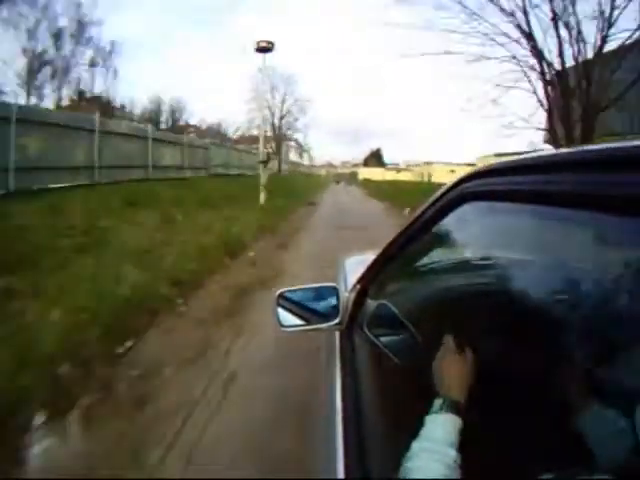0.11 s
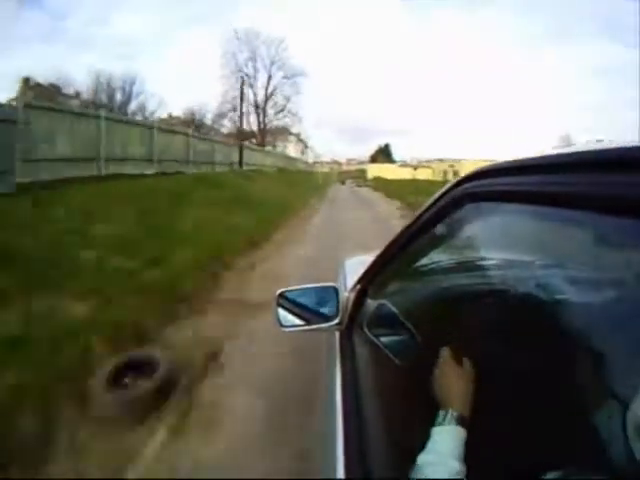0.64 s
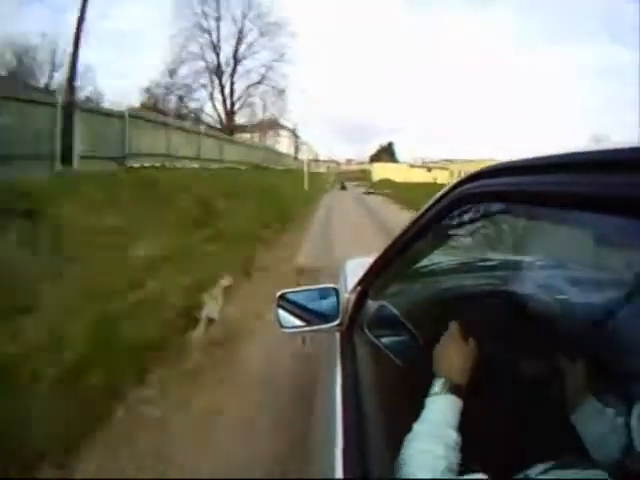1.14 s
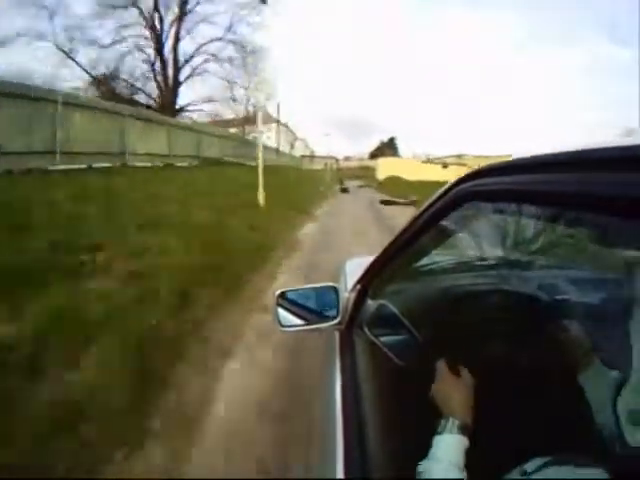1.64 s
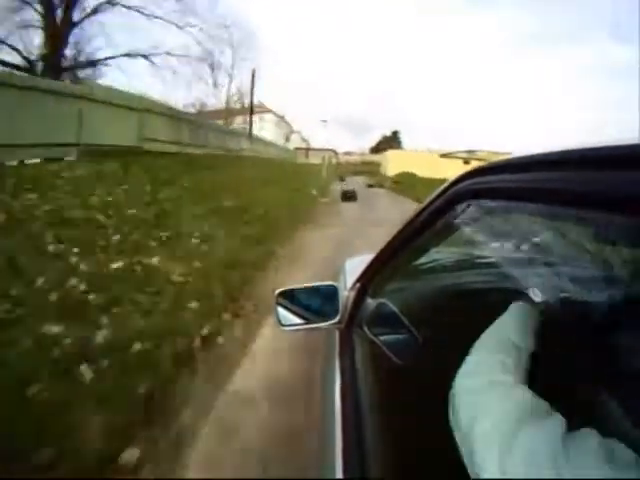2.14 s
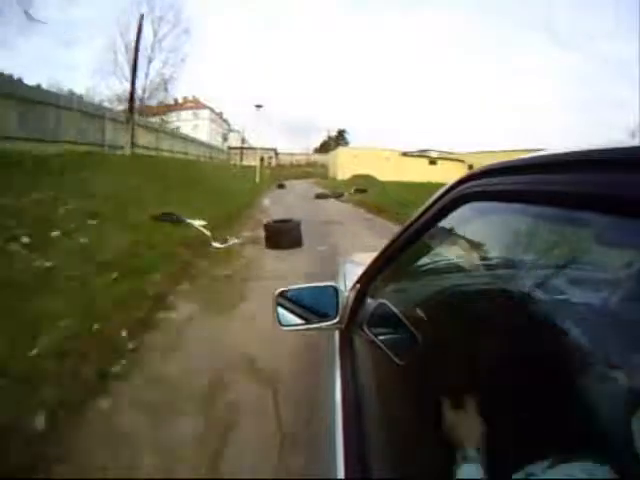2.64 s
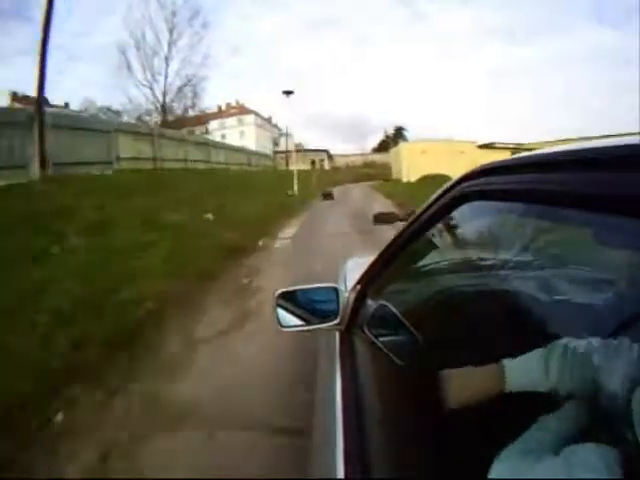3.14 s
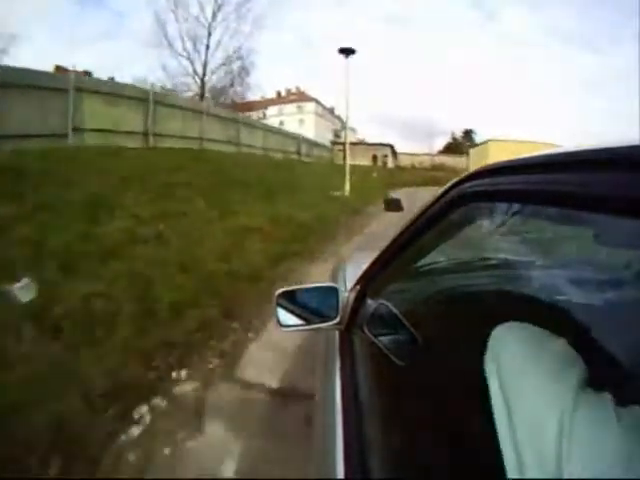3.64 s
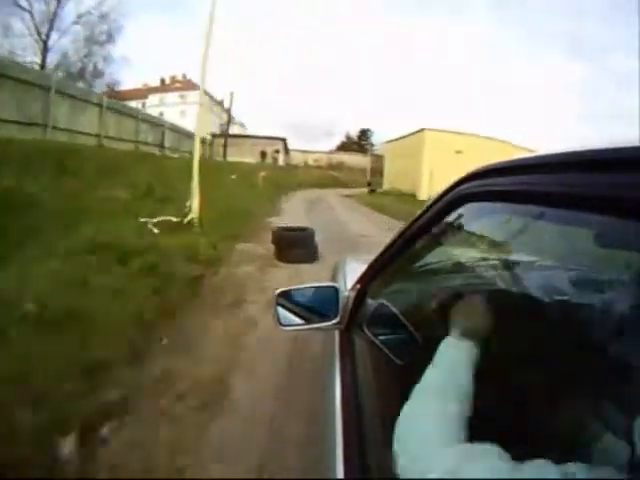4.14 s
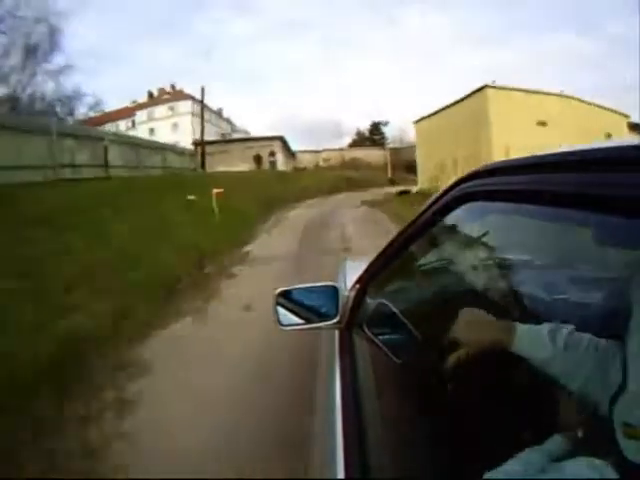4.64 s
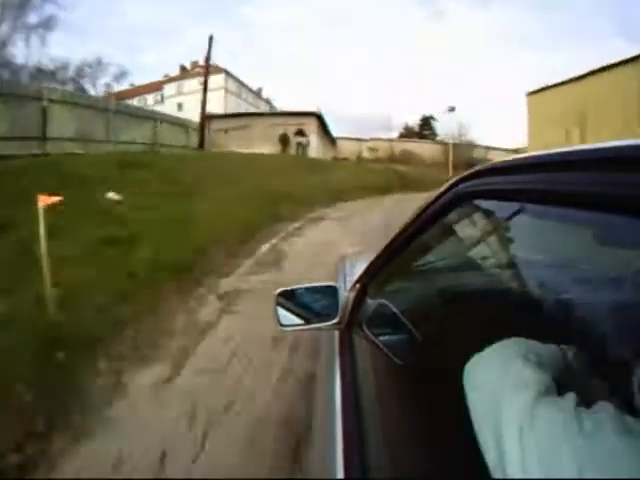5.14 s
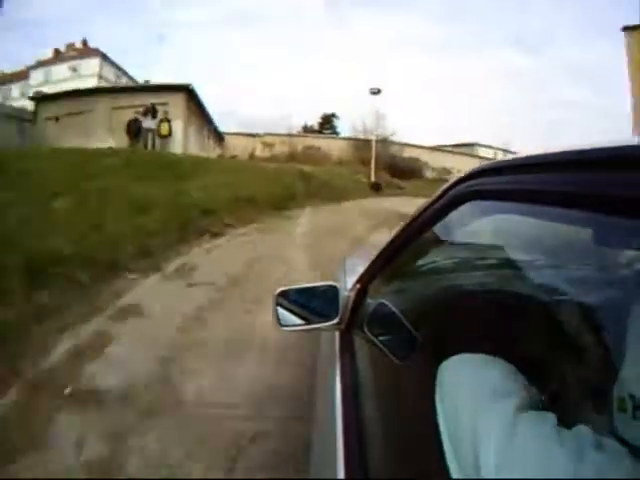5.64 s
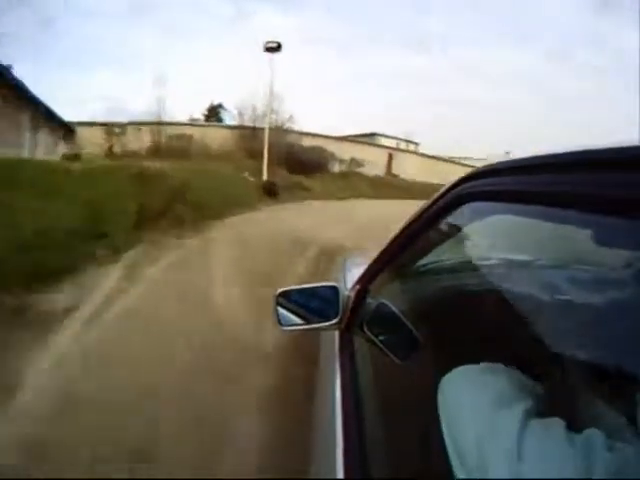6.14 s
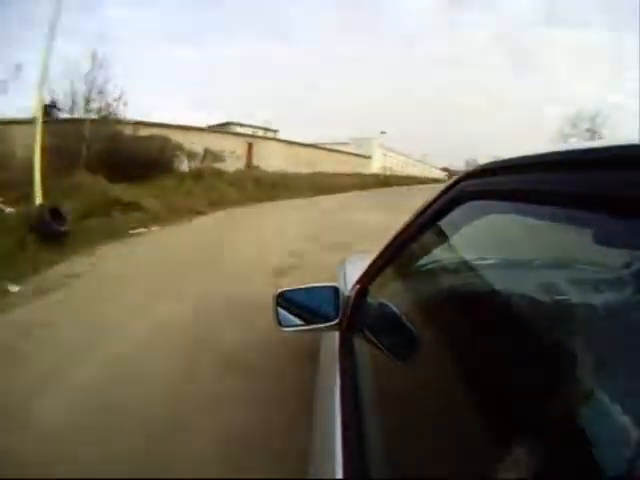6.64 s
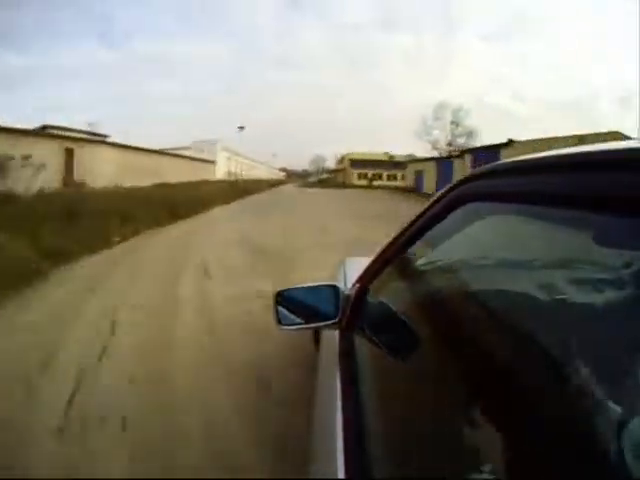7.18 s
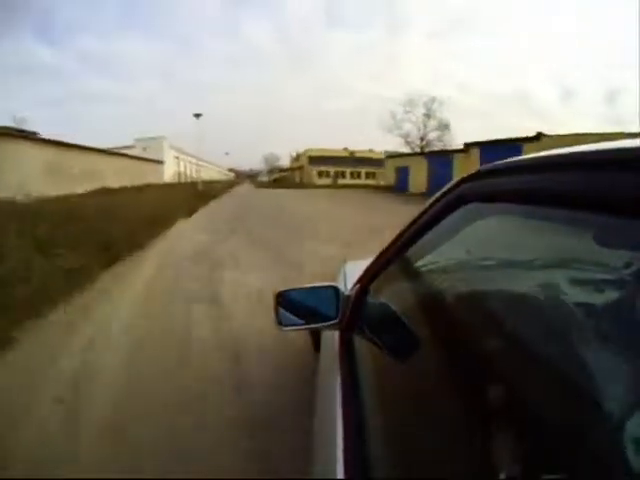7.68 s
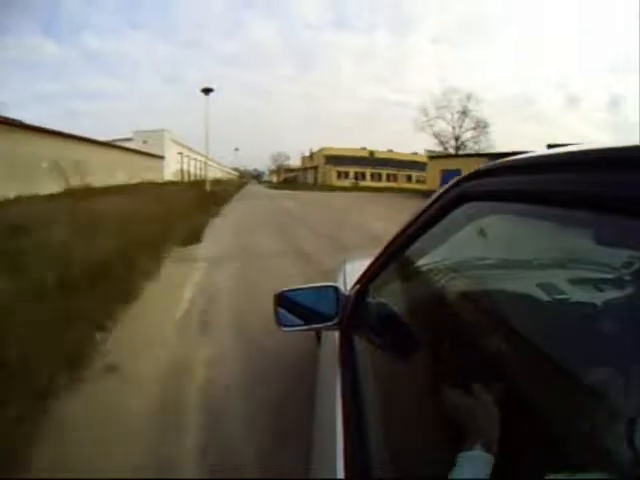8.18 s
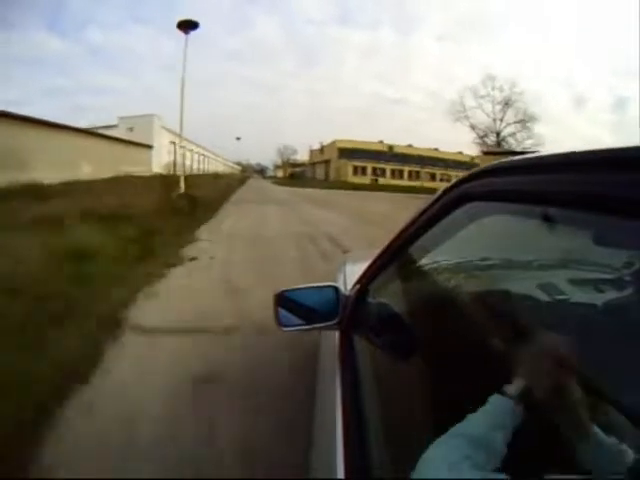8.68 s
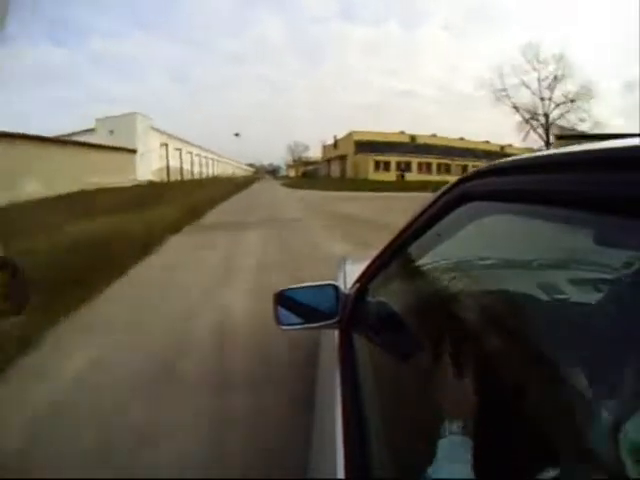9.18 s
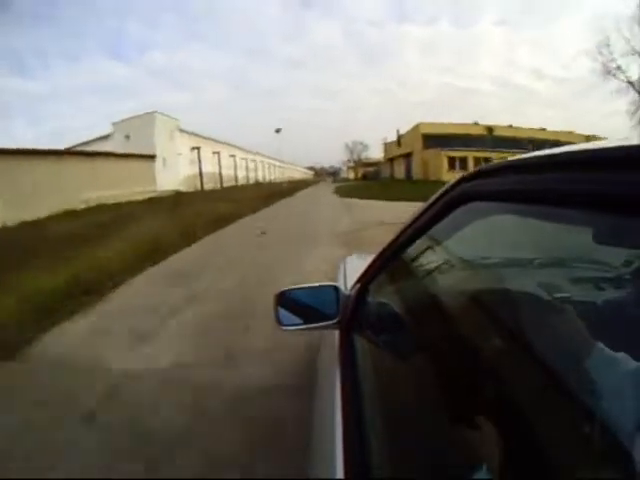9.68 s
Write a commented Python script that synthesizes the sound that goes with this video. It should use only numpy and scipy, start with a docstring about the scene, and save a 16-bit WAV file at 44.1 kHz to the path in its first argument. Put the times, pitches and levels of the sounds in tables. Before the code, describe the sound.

Wind roars over a camera on a speeding small car, then fades to rough road rumble, thuds, clattering loose plastic and a rising engine.

```python
"""A camera clamped outside a small car on a rough road, its one microphone hearing all through case and mount.
Wind, shaped noise, roars past the case first and dies away near 3 s as falling engine tones sink beneath it.
The mount sways near 30 Hz throughout, a wavering sine; bumps thud and drum the panels, tyres hiss, air whistles
briefly. A loose part, rung by short noisy contacts, knocks in clusters, densest near 7 s; then engine tones
rise and fall. The camera samples at a low rate and holds each value, so everything is mirrored up into the
treble."""
import sys
import numpy as np
from scipy import signal
from scipy.io import wavfile
from scipy.ndimage import uniform_filter1d

SR = 44100
rng = np.random.default_rng(int(sys.argv[2]) if len(sys.argv) > 2 else 0)


def master_out(mix):
    """Clip the mix to full scale and print it as 16-bit PCM to the path in sys.argv[1]."""
    frames = np.transpose(np.atleast_2d(mix))
    ceiling = np.clip(frames, -1, 1)
    pcm = np.round(ceiling * 32767).astype(np.int16)
    wavfile.write(sys.argv[1], SR, pcm)


def elevation(decibels):
    """Turn decibel levels (scalar or array-like) into linear amplitude ratios."""
    levels = np.asarray(decibels, float)
    return 10 ** (levels / 20)


N = 432178
T = np.arange(N) / SR

# resonances of the hollow case: (centre [Hz], width [Hz], level over its feed [dB])
CASE_MODES = [(737, 96, 4.5), (1450, 55, -2.5), (2030, 64, -12), (2290, 37, -11), (2800, 180, -20)]
# loud knocks of the loose part: (time [s], relative level [dB], pitch of its main ring [Hz])
LOUD_KNOCKS = [(1.1892, -39, 2165), (1.2146, -30.5, 2020), (1.256, -40, 2440), (1.2885, -30.5, 2070),
               (1.3663, -33.5, 2280), (1.6262, -32, 2335), (1.8911, -35.5, 2257), (1.9694, -28.5, 2026),
               (2.3014, -37.5, 2760), (2.939, -42, 2290), (3.0305, -43, 3070), (3.0709, -44, 2920),
               (3.1617, -37, 2930), (3.2251, -33, 3096), (3.2425, -36, 3210), (3.269, -42, 3400),
               (3.473, -44, 2977), (3.4845, -38.5, 2690), (3.5024, -41.5, 2920), (3.5498, -41, 2550),
               (3.6242, -43, 2833), (3.694, -43, 1910), (3.711, -46, 2964), (3.7309, -44, 3130),
               (3.7454, -41, 2910), (3.7768, -40, 3156), (4.368, -39, 3000), (4.3809, -33, 3008),
               (4.4119, -34.5, 2854), (4.4488, -35.5, 3160), (4.4847, -41, 3020), (4.5176, -34.5, 3130),
               (4.5486, -37, 2710), (4.6264, -40, 2910), (4.6648, -41, 3310), (4.6788, -39, 2820),
               (4.6982, -38.5, 2930), (4.7157, -36.5, 2834), (4.8479, -33, 3070), (4.8793, -42, 2870),
               (4.9881, -43, 3083), (5.255, -35, 2830), (5.2999, -43, 2190), (5.3218, -38.5, 3270),
               (5.3497, -40.5, 3154), (5.4096, -42.5, 2890), (5.5777, -36.5, 3024), (5.6411, -38.5, 2988),
               (5.6595, -33, 3060), (5.692, -33.5, 3100), (5.7064, -36, 3040), (5.7394, -32, 3150),
               (5.7588, -31.5, 3040), (5.8222, -37.5, 2794), (5.9878, -42, 2730), (6.0192, -33.5, 2990),
               (6.0337, -34.5, 3036), (6.0851, -38, 2140), (6.1054, -35.5, 3050), (6.1619, -42, 2843),
               (6.3395, -35, 3100), (6.3729, -39, 2940), (6.3789, -31, 3105), (6.3974, -31, 3040),
               (6.4248, -36.5, 2940), (6.571, -39, 2820), (6.6119, -37, 3080), (6.6443, -36, 3160),
               (6.6752, -38, 3096), (6.6932, -34.5, 3022), (6.7077, -32, 2270), (6.7251, -32, 3200),
               (6.7565, -33, 3160), (6.7905, -29, 2960), (6.8029, -37.5, 2280), (6.8244, -41, 3037),
               (6.8364, -32, 2800), (6.8543, -41, 3140), (6.8882, -31, 3250), (6.8992, -38, 2940),
               (6.9451, -35.5, 3010), (6.9631, -43, 2858), (7.0125, -35.5, 3030), (7.0454, -33.5, 2800),
               (7.0618, -36, 3017), (7.0793, -39, 2910), (7.1082, -33, 3123), (7.1437, -39, 3088),
               (7.2429, -33.5, 3393), (7.2564, -31.5, 2030), (7.4355, -36, 2906), (7.4565, -27, 2097),
               (9.3312, -37, 2700), (9.3861, -35.5, 2860), (9.5083, -37, 2850), (9.5337, -36.5, 2964),
               (9.5966, -31.5, 3052), (9.6994, -36.5, 2080), (9.7732, -33, 3112)]
# how freely the loose part moves, as relative level of its small ticks: (time [s], level [dB])
LOOSENESS = [(1.1, -57), (2.9, -57.5), (3.3, -47), (3.75, -51), (3.85, -50), (4.3, -49), (4.4, -51),
             (5.1, -42), (5.2, -63), (5.5, -49), (5.7, -51), (6.2, -61), (6.7, -51), (7.25, -44.5),
             (7.6, -49), (9.2, -54), (9.4, -45), (9.8, -44)]
DOOR_HZ, DOOR_WIDTH_HZ = 274.7, 19.4


def evened(x):
    """Scale to an rms of one."""
    return x / np.sqrt(np.mean(x ** 2) + 1e-20)


def curves(rows):
    """Each column after the time, drawn as straight lines over the whole scene."""
    s, *columns = np.transpose(rows)
    return [np.interp(T, s, c, left=c[0], right=c[-1]) for c in columns]


def read(points, hz):
    """Read a spectrum along a logarithmic frequency axis."""
    f, value = np.transpose(points)
    return np.interp(np.log(hz + 1), np.log(f + 1), value)


def humps(modes, hz):
    """Power gain of 1 plus resonant humps."""
    return 1 + sum(elevation(2 * db) / (1 + (2 * (hz - f) / width) ** 2) for f, width, db in modes)


def drift(hz):
    """Slow chance of unit rms, up to the given rate."""
    coarse = T[::16]
    lowpass = signal.butter(2, hz, fs=SR / 16, output="sos")
    slow = signal.sosfilt(lowpass, rng.standard_normal(len(coarse)))
    return np.interp(T, coarse, evened(slow))


def noise(power_of, patchy_db, flicker_db, flicker_hz, size):
    """Random short-time spectra with patches, and a flicker shared by all bins."""
    hop = size // 4
    frames, hz = N // hop + 5, np.fft.rfftfreq(size, 1 / SR)
    real, imaginary, patches = rng.standard_normal((frames, len(hz), 3)).T
    patches = uniform_filter1d(patches, size=9, axis=0)
    patches = evened(uniform_filter1d(patches, size=9, axis=1))
    spectra = (real + 1j * imaginary) * np.sqrt(power_of(hz))[:, None] * elevation(patchy_db * patches)
    steady = signal.istft(spectra, nperseg=size, noverlap=size - hop)[1][:N]
    return evened(steady * elevation(flicker_db * drift(flicker_hz)))


def engine():
    """Orders of the firing rate as tones that waver in level; case and door lift those that cross them."""
    # four-cylinder engine: (time [s], firing rate [Hz], load [dB], relative level of upper tones [dB])
    running = [(0, 208, -51.5, -22), (.15, 216.8, -51, -12), (.3, 214.6, -50, -11), (.56, 218, -52, -15),
               (.78, 217, -57.5, -16), (1, 206.7, -62, -11), (1.22, 193, -54, -16),
               (1.66, 171.5, -61.5, -20), (1.8, 162.3, -86, -14), (3.7, 104.8, -84, -24),
               (3.89, 108.5, -49.5, -16.5), (4.31, 111.3, -47.5, -21.5), (4.65, 112.5, -50, -11.5),
               (4.9, 119.4, -67, -3), (5.25, 108, -52, -31), (5.45, 107.5, -47.5, -16.5),
               (5.86, 100.5, -55.5, -22), (6.14, 118, -56.5, -17.5), (6.42, 137.6, -58, -10),
               (6.75, 144, -93, -14), (7.48, 162.5, -92, -7), (7.59, 167.4, -72, -5),
               (7.78, 169.5, -70.5, 5), (7.9, 179.2, -59.5, -1), (8.05, 190.4, -56, -4.5),
               (8.25, 195.6, -52.5, -11.5), (8.5, 196, -55.5, -10), (8.71, 176.6, -54, -17),
               (8.82, 161.5, -68, -14), (9.1, 131.3, -75, -13), (9.3, 134.4, -57, -11),
               (9.6, 139.4, -64, -2.5), (9.8, 143.3, -60, 5.5)]
    # low orders: (multiple of the firing rate, relative level [dB])
    low_orders = [(.5, -9), (1, 1.5), (1.5, -28.5)]
    # upper orders at the reference speed: (multiple of the firing rate, relative level [dB])
    upper_orders = [(2, -2.5), (2.5, -14.5), (3, -2), (4, -10.5)]
    reference_hz, harsh_db = 197, 9.5  # per octave of speed, each order above the second gains this much for each multiple of the firing rate it stands above the second
    hz, load_db, bright_db = curves(running)
    phase = 2 * np.pi * np.cumsum(hz * (1 + 0.0049 * drift(11))) / SR
    octaves = np.log2(hz / reference_hz)
    modes = list(CASE_MODES) + [(DOOR_HZ, 35, 7)]

    def tone(k, db):
        return elevation(db + 2.8 * drift(7.8)) * np.sin(k * phase + 2 * np.pi * rng.random())

    low = sum(tone(k, db) for k, db in low_orders)
    high = 0
    for k, db in upper_orders:
        lift = np.sqrt(humps(modes, k * hz))
        high = high + tone(k, db + harsh_db * (k - 2) * octaves) * lift
    return np.sqrt(2) * elevation(load_db) * (low + elevation(bright_db) * high)


def tyres():
    """Rolling hiss through the hollow of the case, with a few brief fuzzy whistles of air."""
    # rolling: (time [s], relative level [dB])
    rolling = [(0.0, -46.5), (0.68, -44), (1.5, -48), (2.1, -55.5), (2.7, -53.5), (2.95, -61.5),
               (3.7, -63.5), (4.58, -56.5), (5.4, -61), (6.28, -57), (6.52, -55.5), (7.69, -53.5),
               (8.79, -53.5), (8.98, -57), (9.8, -51.5)]
    # spectrum of the hiss ahead of the case: (frequency [Hz], relative level per Hz [dB])
    tread = [(180, -2), (300, -4.5), (539, -5.5), (738, -3.5), (916, -4), (1080, -1), (1250, -2.5),
             (1400, 4), (1870, 0), (2860, -2.5), (4000, -6.5), (5200, -41), (8800, -120)]
    # brief whistles of air: # (time [s], length [s], start pitch [Hz], end pitch [Hz], relative level [dB],
    # pitch jitter [0-1])
    squeaks = [(2.308, .13, 1070, 1180, -58, 0.04), (8.821, .21, 1500, 1200, -56.5, 0.08)]
    hiss = noise(lambda hz: elevation(2 * read(tread, hz)) * humps(CASE_MODES, hz),
                 patchy_db=0.4, flicker_db=0.98, flicker_hz=48.7, size=1024)
    out = hiss * elevation(curves(rolling)[0] + 4)
    for s, length, start_hz, end_hz, db, jitter in squeaks:
        progress = np.clip((T - s) / length, 0, 1)
        glide_hz = start_hz + (end_hz - start_hz) * progress
        phase = 2 * np.pi * np.cumsum(glide_hz * (1 + jitter * drift(148.6))) / SR
        swell = np.sqrt(2 * np.sin(np.pi * progress))
        out = out + elevation(db + 3.1 * drift(44)) * swell * np.sin(phase)
    return out


def shocks(column, rise_s, fall_s):
    """Envelope that jumps at each bump and dies away."""
    # wheels dropping over cracks:
    # (time [s], relative level of the sharp thud [dB], relative level of the low heave of the shell [dB])
    cracks = [(.25, -49, -36.5), (.8, -53, -39), (0.913, -35.5, -63), (1.04, -55, -43), (1.25, -29.5, -48),
              (1.37, -42, -51), (1.789, -39, -30.5), (2.098, -38.5, -59), (2.22, -45, -39), (2.6, -58, -42),
              (2.935, -46, -50), (3.15, -54, -47), (3.209, -51, -31), (4.68, -43.5, -58), (4.827, -38, -28),
              (5.27, -64, -41), (5.7, -48, -44), (6.07, -61, -33), (6.35, -46, -35.5), (6.78, -48, -31),
              (7.198, -40, -28), (7.438, -34.5, -31), (7.49, -38, -35), (7.99, -48, -41), (8.6, -63, -42),
              (8.99, -55, -40), (9.751, -38, -33)]
    envelope, t = np.zeros(N + SR), np.arange(9000) / SR
    shape = (1 - np.exp(-t / rise_s)) * np.exp(-t / fall_s)
    for row in cracks:
        envelope[round(row[0] * SR):][:len(t)] += elevation(row[column]) * shape
    return envelope[:N]


def bumps():
    """Each bump is a dull burst that rises in some ms and dies in a tenth of a second."""
    # spectrum of the thud: (frequency [Hz], relative level per Hz [dB])
    thud = [(40, -3), (120, -4.5), (300, -16.5), (700, -23), (1800, -12.5), (4000, -42)]
    burst = noise(lambda hz: elevation(2 * read(thud, hz)), patchy_db=.5, flicker_db=.6, flicker_hz=30, size=1024)
    return elevation(-4.0) * shocks(column=1, rise_s=0.0062, fall_s=0.032) * burst


def lulls():
    """A short dip in dB at each lull of the sway."""
    # moments when the sway drops out: (time [s], depth [dB])
    dips = [(0.109, -9), (.44, -21), (.95, -30), (1.69, -1), (2.45, -7), (2.73, -8), (3.029, -4),
            (3.16, -8), (3.41, -8), (3.58, -9), (3.83, -9), (4.33, -25), (5.05, -6), (6.2, -23), (6.37, -6),
            (7.35, -36), (7.68, -3), (8.0, -11), (8.32, -10), (8.49, -3), (8.71, -10), (9.12, -13),
            (9.36, -9), (9.6, -20)]
    half_length_s = 0.039
    coarse = T[::64]
    dip_db = sum(db * np.exp(-((coarse - s) / half_length_s) ** 2) for s, db in dips)
    return np.interp(T, coarse, dip_db)


def body():
    """Road shocks rumble through the shell and ring its panels."""
    # roughness of the road between bumps: (time [s], relative level [dB])
    roughness = [(0, -40), (1, -37), (1.6, -36.5), (2.4, -43.5), (3.5, -42.5), (4.3, -49), (5.5, -44.5),
                 (6.6, -39.5), (7.1, -37.5), (8.3, -41.5), (9.15, -43.5), (9.8, -29.5)]
    # spectrum of the shell: (frequency [Hz], relative level per Hz [dB])
    rumble = [(8, -6), (14, -10), (38, -4.5), (54, -7.5), (95, -20.5), (130, -31), (200, -32.5),
              (320, -46.5), (500, -41), (900, -86)]
    # panel resonances: (centre [Hz], width [Hz], level over the rumble [dB])
    panels = [(62, 14, 5)]
    # a door panel drumming between bumps: (time [s], relative level [dB])
    door_drumming = [(0, -61), (.85, -58.5), (1.5, -54.5), (2.4, -63), (4.2, -61), (5.5, -61.5), (7.2, -58),
                     (9.05, -60), (9.55, -52), (9.8, -35)]
    lull_share = 0.2  # share of a lull's depth that the rumble follows
    heave = shocks(column=2, rise_s=0.022, fall_s=0.026)
    road = elevation(curves(roughness)[0] + lull_share * lulls()) + 2 * heave
    road_db = 20 * np.log10(road)
    kick = elevation(-13) * shocks(column=1, rise_s=0.011, fall_s=0.031)
    door_level = elevation(curves(door_drumming)[0] - 6.5) + kick

    def drum(centre_hz, width_hz):
        return noise(lambda hz: 1 / (1 + (2 * (hz - centre_hz) / width_hz) ** 2) ** 2,
                     patchy_db=-0.4, flicker_db=0.3, flicker_hz=25, size=4096)

    shell = noise(lambda hz: elevation(2 * read(rumble, hz)) * humps(panels, hz),
                  patchy_db=0.94, flicker_db=2.5, flicker_hz=6.7, size=4096)
    # the floor pan hums on, following road shocks only in part
    pan_level = elevation(-48.5 + 0.4 * (road_db - road_db.mean()))
    pan = pan_level * drum(centre_hz=100.1, width_hz=13.7)
    return elevation(road_db + 4) * shell + pan + door_level * drum(DOOR_HZ, DOOR_WIDTH_HZ)


def wind():
    """Turbulent roar through the hollow of the case, dying away as the car slows."""
    # roar at the case: (time [s], relative level [dB])
    roar_level = [(0.0, -37.5), (0.52, -38.5), (0.79, -36.5), (1.14, -39.5), (1.3, -41), (1.83, -45.5),
                  (2.09, -49.5), (2.24, -57.5), (2.7, -56), (2.93, -53.5), (3.2, -91)]
    # spectrum of the turbulence ahead of the case: (frequency [Hz], relative level per Hz [dB])
    air = [(180, -35), (300, -14), (327, -17), (438, -14), (575, -23), (722, -6), (926, -11.5), (1410, 0.5),
           (2300, 3.5), (3120, 0), (4000, -5), (5200, -51), (8800, -120)]
    roar = noise(lambda hz: elevation(2 * read(air, hz)) * humps(CASE_MODES, hz),
                 patchy_db=1.0, flicker_db=1.1, flicker_hz=91.0, size=1024)
    fade = np.clip((roar_level[-1][0] - T) / 0.41, 0, 1)  # silent from the last row on
    return elevation(curves(roar_level)[0] + 0.5) * roar * fade


def sway_level():
    """Level of the sway in dB, lulls included, before its chance swells."""
    # sway of the mount: (time [s], level [dB])
    sway = [(0, -35.5), (.22, -26.5), (.6, -34), (.84, -28.5), (1.09, -26), (1.2, -28.5), (1.34, -23),
            (1.85, -30), (2.32, -22.5), (2.42, -35.5), (2.6, -36), (2.9, -32.5), (3.25, -31), (3.7, -33),
            (4.1, -36.5), (4.45, -28.5), (4.6, -32), (4.97, -27), (5.13, -36), (5.27, -28.5), (5.5, -34),
            (5.72, -23), (5.92, -38), (6.06, -27), (6.3, -29.5), (6.5, -34), (6.74, -18.5), (6.95, -27.5),
            (7.25, -22), (7.45, -20), (7.56, -24), (7.85, -33), (8.2, -31.5), (9.04, -32.5), (9.45, -24.5),
            (9.8, -26)]
    return curves(sway)[0] + lulls()


def ticks(phase):
    """Small knocks by chance, at most one each half swing, harder when the sway is strong."""
    tick_chance, sway_follow, spread_db = .75, .5, 3
    pitch_hz, scatter_hz = 2980, 298.1
    at = np.flatnonzero(np.diff(np.floor((phase + 2.0) / np.pi)))
    at = at[T[at] > LOOSENESS[0][0]]
    sway_db = sway_level()
    chance = rng.random(len(at))
    spread, pitch, late = rng.standard_normal((len(at), 3)).T
    db = curves(LOOSENESS)[0][at] + sway_follow * (sway_db[at] - sway_db.mean())
    db = db + spread_db * np.clip(spread, -3, 1)
    rows = np.transpose([T[at] + 0.002 * late, db, pitch_hz + scatter_hz * pitch])
    # none within 8 ms of a loud knock
    free = np.abs(T[at][:, None] - np.array(LOUD_KNOCKS)[:, 0]).min(1) > 0.008
    return [tuple(row) for row in rows[(chance < tick_chance) & free]]


def rattle(phase):
    """Each knock is a contact and a short scrape that ring the part; chatter comes twice a swing."""
    # resonances of the loose part: (pitch [Hz], width [Hz], relative level [dB])
    part_modes = [(2280, 420, -3.5), (2992, 530, 3.5), (3160, 740, -33), (1540, 1100, 3.5), (725, 135, -1)]
    chatter_db = -26.5  # relative to the looseness
    cling_db, cling_s = -20, 0.026  # chatter under each knock, lingering around it
    out, t = np.zeros(N + SR), np.arange(900) / SR

    def ring(hz, width):
        return np.exp(-np.pi * width * t) * np.sin(2 * np.pi * hz * t)

    def radiate(x):
        return np.diff(x, prepend=0)  # a small part radiates little bass

    part = sum(elevation(db) * ring(hz, width) for hz, width, db in part_modes)
    contact = (t / 0.00091) ** 2 * np.exp(-t / 0.00049)
    scrape = 0.17 * (t / 0.003) * np.exp(-t / 0.0022)
    blows = list(LOUD_KNOCKS) + ticks(phase)
    pushes = rng.standard_normal((len(blows), 900)) * (contact + scrape)
    for (s, db, hz), push in zip(blows, pushes):
        knock = signal.fftconvolve(push, radiate(part + 1.1 * ring(hz, 280)))
        out[round(s * SR):][:len(knock)] += elevation(db - 14.0) * evened(knock)

    wobble_db = 3.5 * drift(70)
    # strongest twice a swing, somewhat before the swing is fastest
    touching = (0.15 + np.abs(np.cos(phase + 0.76)) ** 3) * elevation(wobble_db)
    chatter = evened(signal.oaconvolve(touching * rng.standard_normal(N), radiate(part))[:N])
    coarse = T[::64]
    cling = np.sqrt(sum(elevation(2 * db) * np.exp(-((coarse - s) / cling_s) ** 2) for s, db, hz in LOUD_KNOCKS))
    level = elevation(curves(LOOSENESS)[0] + chatter_db) + elevation(cling_db) * np.interp(T, coarse, cling)
    return out[:N] + level * chatter


def mount():
    """The lightly damped mount swings almost as a sine; returns the swing and its phase."""
    # rate of the sway before its chance wander: (time [s], rate [Hz])
    sway_rate = [(0, 31.1), (.75, 29.05), (2.4, 30.51), (3.05, 30.4), (3.2, 33.1), (4.4, 33.6),
                 (4.6, 30.44), (5, 32.47), (6.1, 30.67), (6.35, 27.29), (6.7, 30.05), (7.45, 28.8),
                 (7.75, 32), (9.4, 30.25), (9.6, 25.12), (9.8, 24.85)]
    hz, db = curves(sway_rate)[0], sway_level()
    phase = 2 * np.pi * np.cumsum(hz * (1 + 0.02857 * drift(6))) / SR
    swing = np.sin(phase) + 0.039 * np.sin(2 * phase + 1.75)
    lumpy_db = 0.97 * drift(7.6)  # swells and drops by chance
    return np.sqrt(2) * elevation(db + lumpy_db) * swing, phase


def scene():
    """All sources reach the one microphone through case and mount."""
    swing, phase = mount()
    mix = swing + engine() + wind() + tyres() + body() + bumps() + rattle(phase)
    return mix[None]


def roll_off(x):
    """The treble ends steeply here."""
    return signal.sosfilt(signal.butter(12, 16600, fs=SR, output="sos"), x)


def record(dry):
    """Low-pass, sample slowly, and hold each value until the next: a staircase with mirrored treble."""
    hold_hz, block_hz, frames_per_s = 8012.75, 8000, 30
    smooth = signal.sosfilt(signal.butter(6, 3700, fs=SR, output="sos"), dry[0])
    # steps run slow at the block rate and catch up at each picture frame
    lag = (hold_hz - block_hz) / frames_per_s * (T * frames_per_s % 1)
    held = np.interp(np.floor(T * hold_hz - lag) / hold_hz, T, smooth)
    edge = signal.firwin(numtaps=255, cutoff=15500, window=("kaiser", 6), fs=SR)
    finished = signal.oaconvolve(held, edge, "same")[None]
    return roll_off(finished)


dry = scene()
out = record(dry)
master_out(out)
```